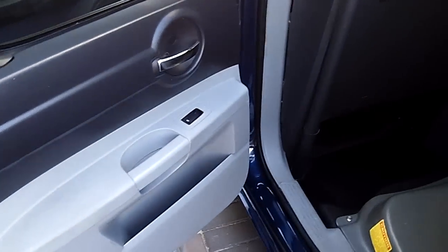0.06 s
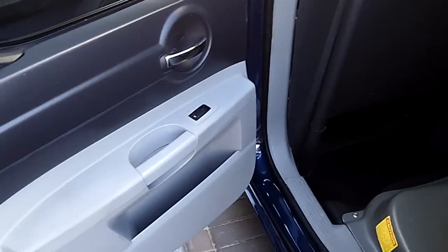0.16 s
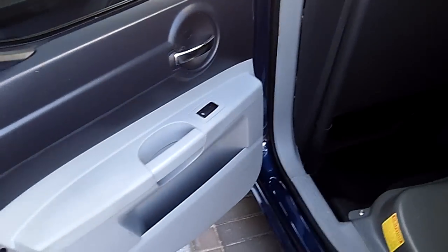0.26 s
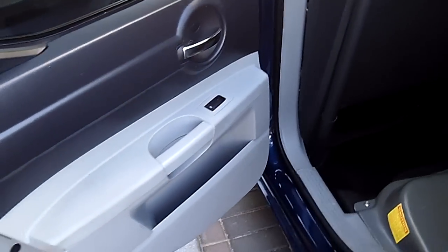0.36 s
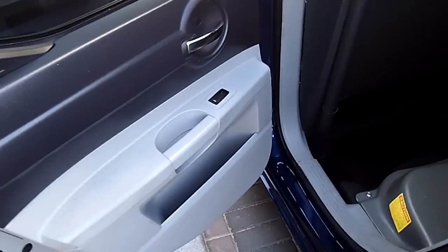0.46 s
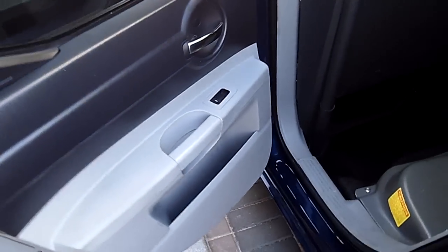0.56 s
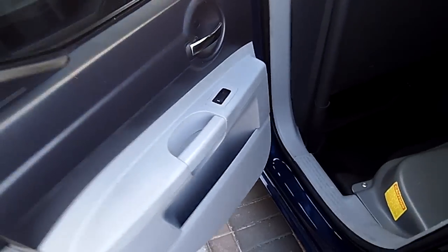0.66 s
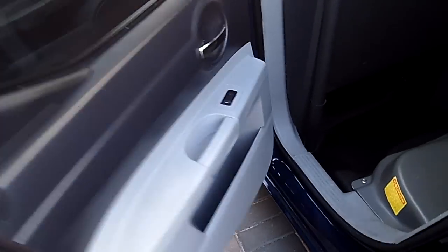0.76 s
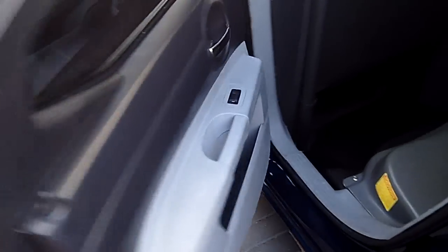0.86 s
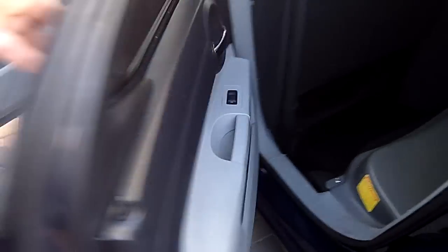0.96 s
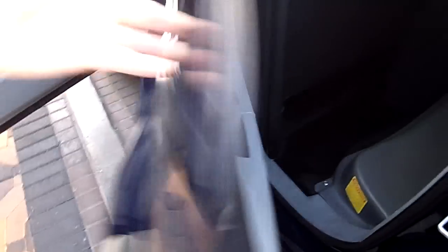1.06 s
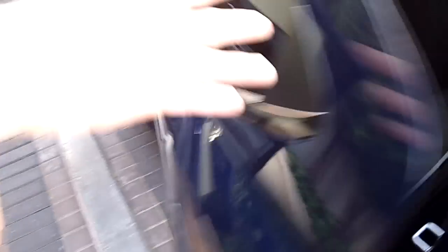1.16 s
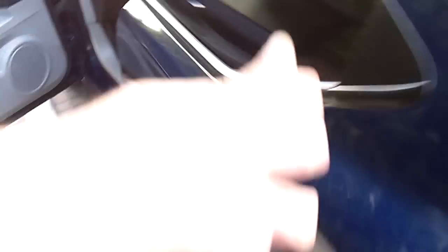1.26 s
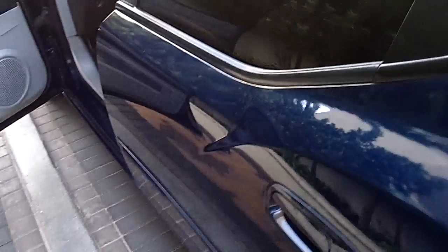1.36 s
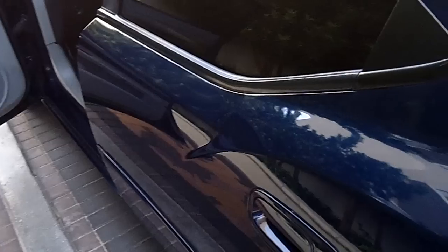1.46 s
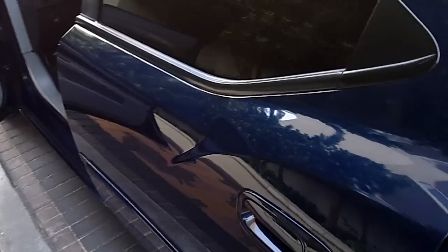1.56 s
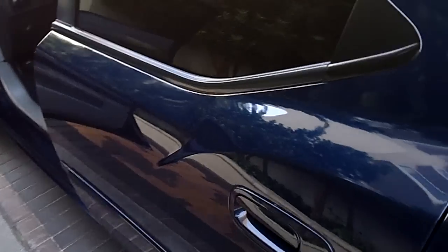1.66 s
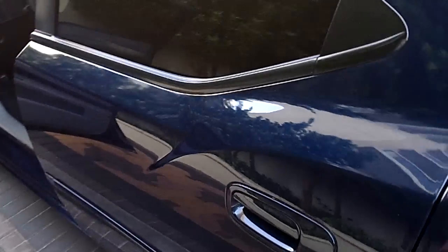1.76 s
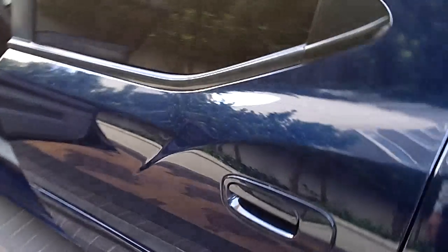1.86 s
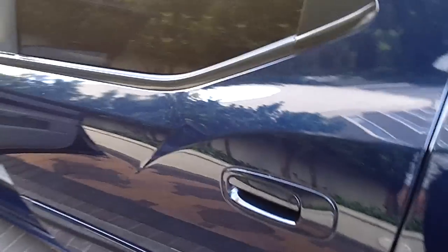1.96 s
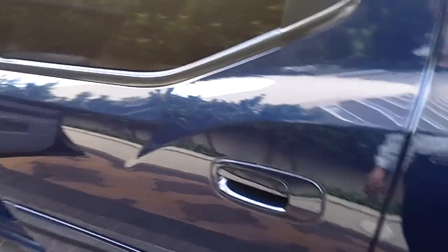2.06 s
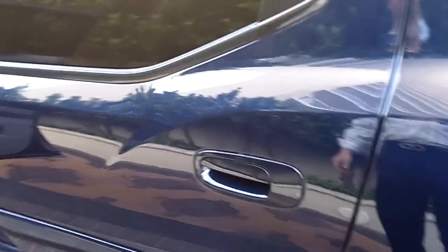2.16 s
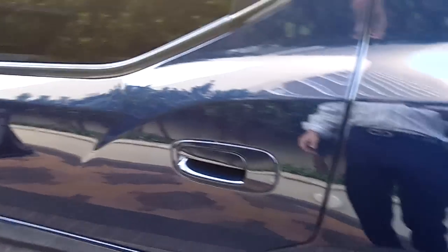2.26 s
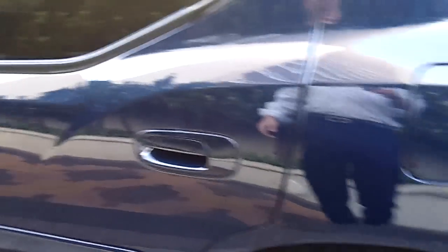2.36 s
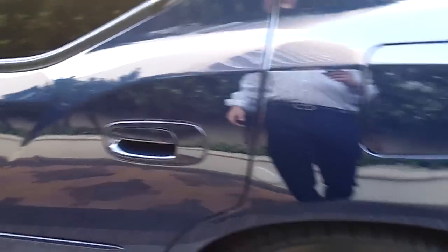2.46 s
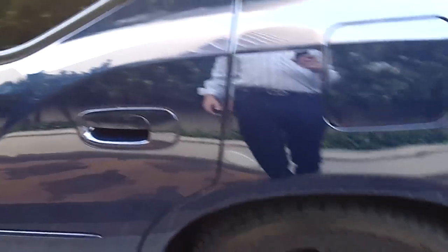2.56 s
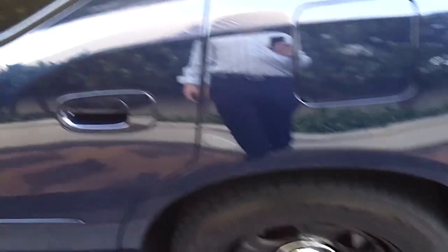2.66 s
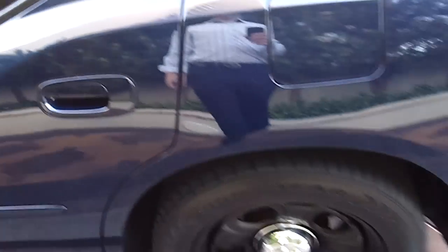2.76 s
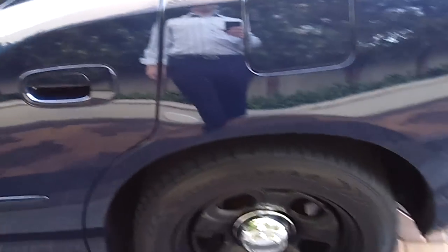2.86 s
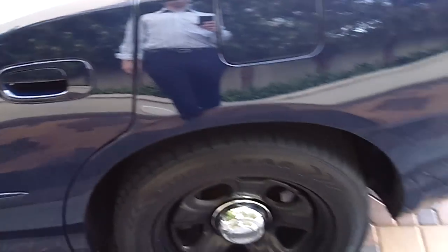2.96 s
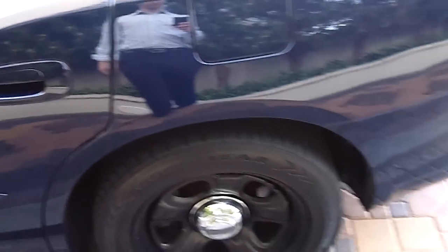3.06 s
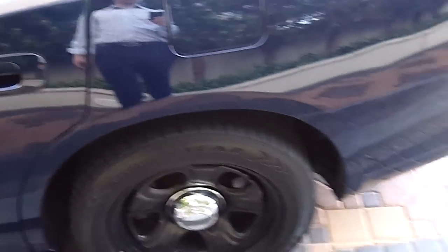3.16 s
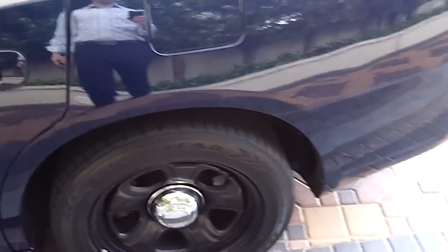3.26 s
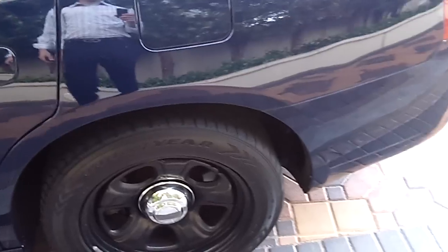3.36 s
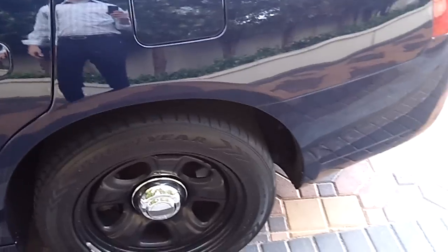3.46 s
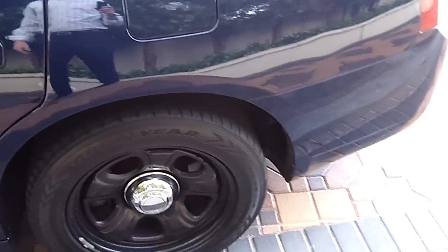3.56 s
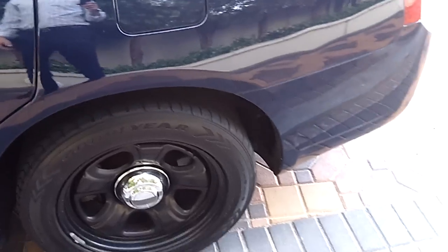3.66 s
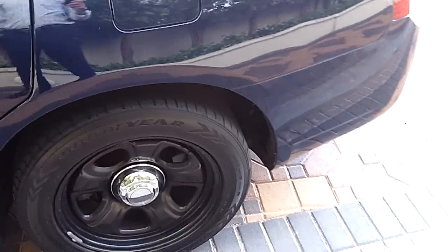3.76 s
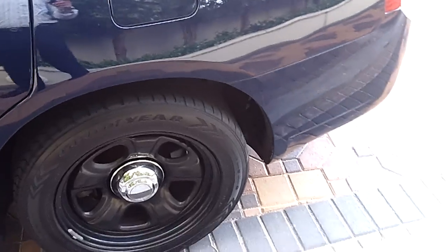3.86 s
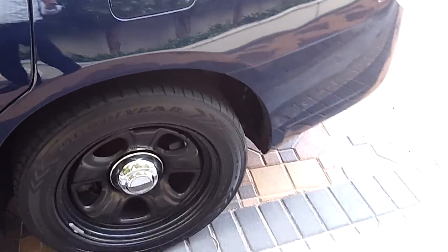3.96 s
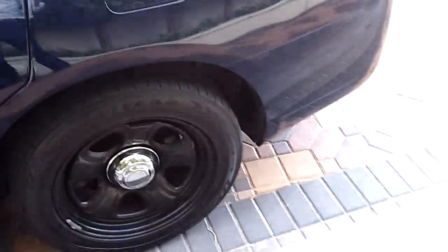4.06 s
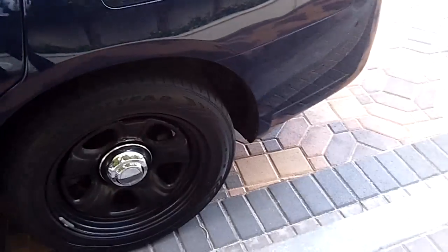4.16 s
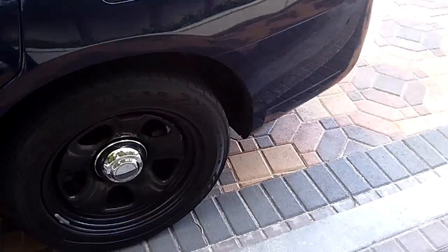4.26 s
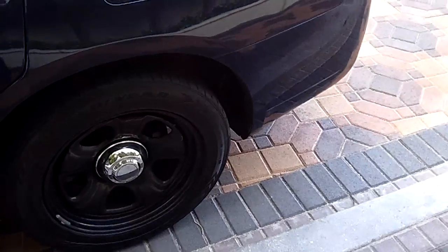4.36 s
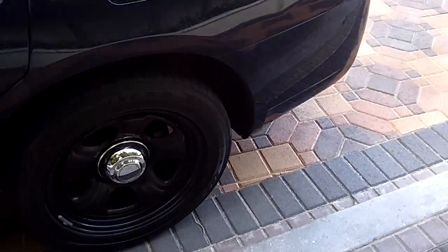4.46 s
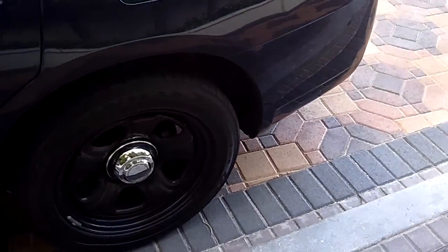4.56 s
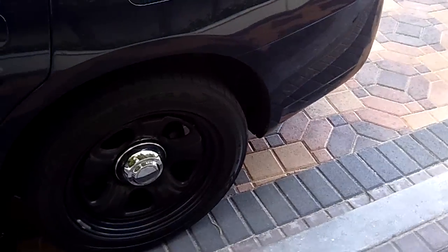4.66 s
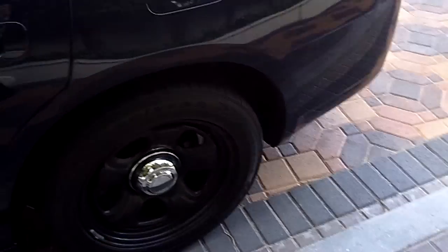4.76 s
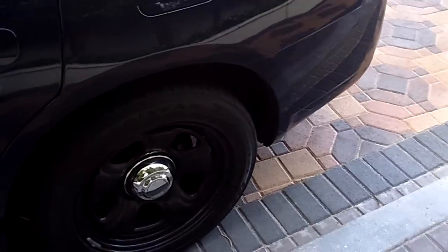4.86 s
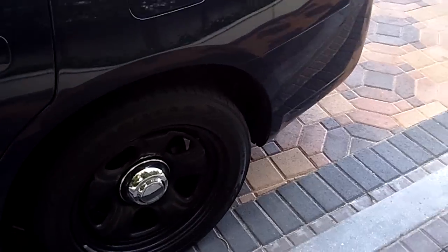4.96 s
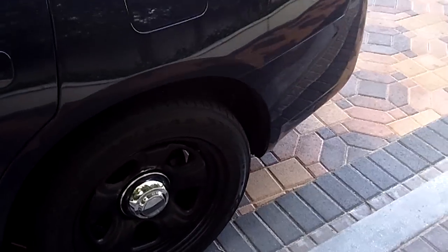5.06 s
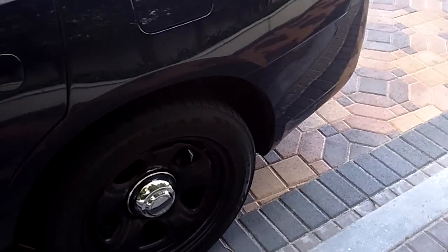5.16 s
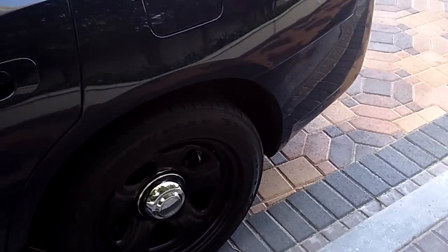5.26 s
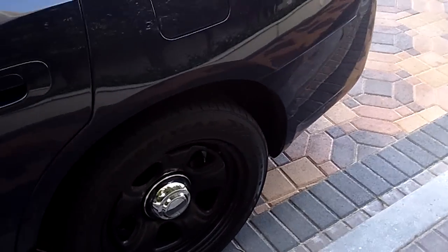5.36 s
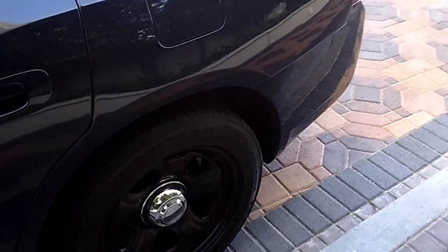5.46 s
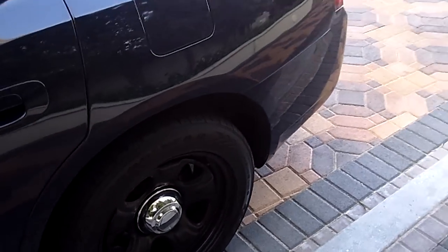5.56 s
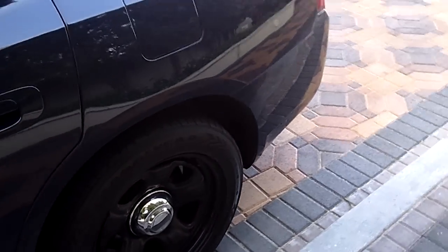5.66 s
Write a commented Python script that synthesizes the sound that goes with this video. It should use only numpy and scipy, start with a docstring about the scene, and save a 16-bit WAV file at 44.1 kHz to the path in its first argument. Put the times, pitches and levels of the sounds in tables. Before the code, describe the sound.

A steady engine idle with fan-like roar and faint unsteady machine tones fills a paved outdoor lot. Early on, a car door bangs shut very near the microphone, distorted and dry, with a brief rattling tail. Automatic gain pulls the hum down, then lets it creep up. Later come a barely audible peep and three small taps on the device's shell, the first much the strongest.

```python
"""In the open air over a paved lot, an engine idles as a harmonic series in noise, among faint machine whines.
At 1.5 s a car door slams: each contact excites damped modes and a noise crack, then the panels shudder.
The slam overloads the recorder, whose gain control ducks, holds and creeps back.
A faint falling chirp follows at 4.1 s; from 4.7 s three taps ring the camera's shell as damped modes."""
import sys
import numpy as np
from scipy import signal
from scipy.fft import rfft, irfft, next_fast_len
from scipy.io import wavfile
from scipy.ndimage import uniform_filter1d, map_coordinates

SR = 44100
rng = np.random.default_rng(int(sys.argv[2]) if len(sys.argv) > 2 else 0)


def bounce(signal):
    """Save signal as a 16-bit WAV file at the path given by the first command-line argument."""
    frames = np.transpose(np.atleast_2d(signal))
    limited = np.clip(frames, -1, 1)
    pcm = np.round(limited * 32767).astype(np.int16)
    wavfile.write(sys.argv[1], SR, pcm)


N = 251370

# door contacts, seal, latch, frame and rebounds: start_s, thud_db, crack_db, rise_s
DOOR_CONTACTS = [(1.487, -20, -39, 0.00084), (1.5333, 6, -8.5, 0.00027), (1.5368, -3.5, -9.5, 0.001),
                 (1.5418, -2, -19, 0.00083), (1.5441, 0, -11, 0.0014), (1.548, -1, -17, 0.00067),
                 (1.566, -7, -13, .0006), (1.576, -2, -24, 0.0018), (1.588, -19, -26, .001),
                 (1.611, -20, -35, .001), (1.622, -22, -34, .001), (1.659, -19, -36, 0.00081),
                 (1.666, -34, -38, .001)]
# damped modes of the door: pitch_hz, level_db, t60_s
DOOR_MODES = [(130, -35, 0.08), (188, -16.5, 0.071), (274.5, -17, 0.14), (350, -8.5, 0.058),
              (477, -11.5, 0.056), (592, -9, 0.039), (717, -6.5, 0.015), (803, -9.5, 0.028),
              (900, -6, 0.011), (1084, -28, 0.036), (1410, -28, .03), (1662, -24, 0.06),
              (1980, -19.5, 0.022), (2880, -21.5, .02), (3820, -32, .02), (5700, -41, 0.017)]
# outer skin, pushed as the seal squeezes: pitch_hz, level_db, t60_s
SKIN_MODES = [(663, 9.5, 0.049)]
# relative noise spectrum of the contact cracks: frequency_hz, density_db_per_hz
CRACK_SPECTRUM = [(300, -22), (1500, 3.5), (3000, -20), (6000, -14), (7700, -23), (10000, -20),
                  (16000, -31)]
# relative noise spectrum of the panels after the blow: frequency_hz, density_db_per_hz
SHUDDER_SPECTRUM = [(24, -34), (40, -4), (174, -14), (281, 3.5), (442, -16), (518, -9.5), (580, -14),
                    (1340, -13.5), (5220, -40), (9000, -59), (11700, -99), (19800, -120)]
# decay time of the panels: frequency_hz, t60_s
SHUDDER_DECAY = [(60, 1), (250, 0.21), (1000, 0.19), (4000, 0.14), (9000, 0.14)]
# taps on the camera's shell: start_s, click_db, rebound_db, thump_db, click_rise_s, direction (signed factor)
SHELL_TAPS = [(4.6724, 3.5, -2, -9, 0.0003, -1.07), (4.86198, -21, -8, -30, .00018, 1),
              (5.255, -45, -45, -27, .0004, -1)]
# bright modes of the shell: pitch_hz, level_db, t60_s
CLICK_MODES = [(1101, -11.5, 0.0059), (1495, -5.5, 0.0089), (1900, -8.5, 0.0062), (2270, -10, 0.0075),
               (3020, -0.5, 0.0034), (4300, -12, 0.006), (6240, -20, 0.0047), (8640, -16, 0.0021),
               (13100, -32, .003)]
# hollow modes of the shell: pitch_hz, level_db, t60_s
THUMP_MODES = [(238, 2, 0.015), (323, 6.5, 0.011), (457, 6, 0.013), (620, 1.5, 0.023), (1030, -2, 0.0093),
               (1500, 4, 0.009)]
# idling engine, its speed hunting up and down: time_s, firing_hz, first_order_db
ENGINE_IDLE = [(0.0, 42, -46), (0.3, 42.1, -43), (1.05, 40.35, -49.5), (1.4, 40.54, -47), (1.73, 41.0, -39),
               (1.98, 40.8, -38), (2.55, 42.7, -34), (3.0, 42.17, -35), (3.6, 40.5, -42),
               (4.25, 42.63, -37.5), (4.9, 42.63, -39), (5.45, 40.4, -44), (5.7, 41.6, -47)]
# levels of the two roar bands: time_s, low_roar_db, high_roar_db
ROAR_LEVELS = [(0.0, -34, -40), (1.5, -35, -41), (2.1, -36, -42), (2.7, -35, -40.5), (4.1, -37.5, -41),
               (4.5, -35, -38), (5.7, -35.5, -39)]
# relative spectrum of the low roar: frequency_hz, density_db_per_hz
LOW_ROAR_SPECTRUM = [(20, -12), (62, -6.5), (100, -6), (160, -5.5), (215, -2.5), (310, -5), (360, 1),
                     (420, -6), (460, -4), (530, -6.5), (597, -8), (670, -7.5), (741, -7.5), (870, -8.5),
                     (1100, -10.5), (1430, -14.5), (2420, -120)]
# relative spectrum of the high roar: frequency_hz, density_db_per_hz
HIGH_ROAR_SPECTRUM = [(410, -27), (800, -11), (1100, -7), (1400, -6), (1740, -3.5), (2100, -9), (2500, -13),
                      (2950, -12), (3500, -15.5), (3800, -20), (4450, -24), (4900, -23.5), (5300, -26.5),
                      (6400, -28), (7300, -35.5), (7700, -44.5), (9900, -53), (16700, -120)]
# machine whines: pitch_hz, faint_level_db, pitch_wander (scale, share of pitch), flicker_db (scale)
MACHINE_WHINES = [(239.4, -53, 0.0025, 2), (275.3, -52.5, 0.0014, 1.5), (884.4, -51.5, 0.00814, 4),
                  (1017, -65, .001, 3), (1057, -59, 0.00097, 4), (1188, -56, .001, 0),
                  (1310, -64, 0.00077, 1.5), (2836, -58.5, 0.00203, 1.5)]
# spells in which a whine stands out, one list for each whine: start_s, length_s, level_db
WHINE_SPELLS = [
    [(0.5, 1.07, -44.5), (1.75, 0.46, -44), (4.7, 1.1, -44)],
    [(-.1, 0.51, -45), (0.65, 2.07, -43.5), (3.2, 0.18, -46), (3.75, 0.89, -46), (5.0, 0.37, -45)],
    [(0.55, 0.41, -42.5), (1.28, .3, -38.5), (1.75, 1.82, -47), (3.8, 1.06, -46), (4.75, 0.53, -44.5),
     (5.6, 0.17, -43.5)],
    [(2.6, 1.2, -60), (4.3, 1.5, -52.5)],
    [(0.1, 2.3, -51.5), (2.3, 1.8, -55), (4.4, 1.44, -53)],
    [(-.1, 0.67, -53), (1.0, 0.56, -46), (2.95, 1.7, -50)],
    [(0.1, .8, -48.5), (0.9, .65, -44), (1.9, 1.1, -51), (3.45, 0.89, -49), (4.85, 0.54, -47)],
    [(4.7, 1.2, -56)],
]
# relative spectrum of the microphone hiss: frequency_hz, density_db_per_hz
HISS_SPECTRUM = [(4470, -33), (7600, -22.5), (7790, 3), (8380, 7.5), (10200, 4), (15000, 4.5), (15800, -1)]

SHUT_S = 1.55  # the second engine order steps in level here
SECOND_OPEN_DB, SECOND_SHUT_DB = -44.5, -39  # second order, door open and door shut
THIRD_DB, BOOM_HZ, BOOM_WIDTH_HZ = -43, 122, 7  # third order is loudest where it meets a boom near this pitch
SPELL_FADE_S = 0.047
CHIRP_S, CHIRP_LENGTH_S, CHIRP_DB, CHIRP_HZ, CHIRP_SAG_HZ = 4.088, .022, -66, 8480, 351
OVERLOAD_DB, REACTION_S, DUCK_S = 2.5, .0105, .008  # threshold, delay and smoothing of the gain control
TOP_HZ = 15830  # band limit


def amp(db):
    """Logarithmic level: decibels to a linear gain."""
    return 10 ** (np.asarray(db) / 20)


def unit(x):
    """Normalization: scaled to rms 1."""
    return x / np.sqrt(np.mean(x ** 2) + 1e-20)


def along(points, hz):
    """Logarithmic frequency scale: interpolates (frequency_hz, value) points."""
    f, v = np.transpose(points)
    return np.interp(np.log(hz + 1), np.log(f + 1), v)


def curves(rows):
    """Linear interpolation in time: one value per sample for each column after the time."""
    s, *cols = np.transpose(rows)
    return [np.interp(np.arange(N) / SR, s, c) for c in cols]


def wobble(rate):
    """Slow random modulation: a smooth curve through rate random knots a second."""
    knots = rng.standard_normal(int(N * rate / SR) + 4)
    return map_coordinates(knots, [np.arange(N) * rate / SR])


def filtered(x, response):
    """Linear filtering: the spectrum of x times a response of frequency."""
    m = next_fast_len(N + SR // 2)
    return irfft(rfft(x, m) * response(np.fft.rfftfreq(m, 1 / SR)), m)[..., :N]


def rush(spectrum, patchy_db):
    """Shaped noise of rms 1, its gain varying at random in patches of time and frequency."""
    z = signal.stft(rng.standard_normal(N), nperseg=512)[2]
    field = uniform_filter1d(rng.standard_normal(z.shape), 6, 0)
    field = uniform_filter1d(field, 14, 1)
    patchy = signal.istft(z * amp(patchy_db * unit(field)), nperseg=512)[1][:N]
    return unit(filtered(patchy, lambda hz: amp(along(spectrum, hz))))


def tone(hz):
    """Phase as the integral of frequency: a sine of rms 1 that follows a pitch curve."""
    return np.sqrt(2) * np.sin(2 * np.pi * np.cumsum(hz) / SR)


def ring(modes, attack, scatter_db):
    """Modal superposition: one blow excites damped modes with newly scattered strengths."""
    t = np.arange(SR // 4) / SR
    hz, db, t60 = np.transpose(modes)[:, :, None]
    db = db + scatter_db * rng.standard_normal(db.shape)
    partials = amp(db - 60 * t / t60) * np.sin(2 * np.pi * hz * t)
    return np.sum(partials, axis=0) * (1 - np.exp(-t / attack))


def add(track, s, sound):
    """Linear superposition: mixes a sound in at s seconds."""
    track[round(s * SR):][:len(sound)] += sound


def panel_shudder():
    """Frequency-dependent damping: panel noise swells, then decays with the treble dying first."""
    hz, t, z = signal.stft(rng.standard_normal(SR), SR, nperseg=256)
    decay_db = 60 * t / along(SHUDDER_DECAY, hz)[:, None]
    shape_db = along(SHUDDER_SPECTRUM, hz)[:, None] - decay_db
    shudder = signal.istft(z * amp(shape_db), SR, nperseg=256)[1][:SR]
    swell = 1 - np.exp(-np.arange(SR) / SR / 0.019)
    rattle = amp(2.6 * wobble(55.5)[:SR])  # loose trim makes the fade uneven
    return amp(-20.5) * unit(shudder * swell) * rattle


def door():
    """Impact excitation: the skin is pushed, contacts ring modes and crack, and the panels shudder."""
    out = np.zeros(N)
    add(out, 1.5282, -ring(SKIN_MODES, attack=.02, scatter_db=4))
    t = np.arange(SR // 50) / SR
    grit = rush(CRACK_SPECTRUM, patchy_db=-2.5)
    crack_rise = 1 - np.exp(-t / 0.00044)
    for s, thud_db, crack_db, rise in DOOR_CONTACTS:
        add(out, s, amp(thud_db) * ring(DOOR_MODES, attack=rise, scatter_db=1.5))
        crack_envelope = amp(crack_db - 60 * t / 0.0043) * crack_rise
        add(out, s, crack_envelope * grit[round(s * SR):][:len(t)])
    add(out, 1.534, panel_shudder())
    return out


def taps():
    """Impact on a shell: bright modes click, click again on a quick rebound, then hollow modes thump."""
    out = np.zeros(N)
    scatter_db = .8
    for s, click_db, rebound_db, thump_db, rise, direction in SHELL_TAPS:
        add(out, s, direction * amp(click_db) * ring(CLICK_MODES, rise, scatter_db))
        add(out, s + 0.00098, direction * amp(rebound_db) * ring(CLICK_MODES, rise, scatter_db))
        add(out, s + 0.00223, amp(thump_db) * ring(THUMP_MODES, 0.00066, scatter_db))
    return out


def engine():
    """Harmonic orders of the firing rate: exhaust hum over the roar of fan, belts and traffic."""
    hz, first_db = curves(ENGINE_IDLE)
    low_db, high_db = curves(ROAR_LEVELS)
    second_db = np.where(np.arange(N) < SHUT_S * SR, SECOND_OPEN_DB, SECOND_SHUT_DB)
    # resonance curve of the boom
    detuning = 2 * (3 * hz - BOOM_HZ) / BOOM_WIDTH_HZ
    third_db = THIRD_DB - 10 * np.log10(1 + detuning ** 2)

    hz = hz + 0.19 * wobble(6.02)
    hum = amp(first_db + .4 * wobble(8)) * tone(hz)
    hum += amp(second_db + 0.97 * wobble(2.4) + 0.52 * wobble(12)) * tone(2 * hz)
    hum += amp(third_db + 1.8 * wobble(14)) * tone(3 * hz)

    throb = amp(0.53 * tone(hz))  # the low roar swells once per firing
    low_noise = unit(throb * rush(LOW_ROAR_SPECTRUM, patchy_db=1.3))
    low = amp(low_db + .5 * wobble(7)) * low_noise
    high = amp(high_db + 0.12 * wobble(7)) * rush(HIGH_ROAR_SPECTRUM, patchy_db=1.1)
    return hum + low + high


def whines():
    """Frequency and amplitude modulation: unsteady faint tones, each fading up for spells."""
    t, out = np.arange(N) / SR, np.zeros(N)
    for (hz, faint_db, wander, flicker_db), spells in zip(MACHINE_WHINES, WHINE_SPELLS):
        level = amp(faint_db)
        for s, length, db in spells:
            inside_s = np.minimum(t - s, s + length - t)  # time to the nearer end of the spell
            fade = np.clip(inside_s / SPELL_FADE_S + .5, 0, 1)
            level = level + (amp(db) - amp(faint_db)) * fade
        flicker = unit(amp(1.1 * wobble(5.4) + flicker_db * wobble(14)))
        drift = wander * (.6 * wobble(5) + 0.81 * wobble(22))
        out += level * flicker * tone(hz * (1 + drift))
    return out


def chirp():
    """Frequency glide: a short falling peep under a half-sine envelope, perhaps a far bird."""
    u = np.clip((np.arange(N) / SR - CHIRP_S) / CHIRP_LENGTH_S, 0, 1)
    return amp(CHIRP_DB) * np.sin(np.pi * u) * tone(CHIRP_HZ - CHIRP_SAG_HZ * u ** 2)


def scene():
    """Superposition of all sources at the microphone."""
    return (door() + taps() + engine() + whines() + chirp())[None]


def gain_control(x, depth_db, hold_s, rise_db_per_s):
    """Delayed compression: an overload ducks the gain; after a hold it climbs at a steady rate in dB."""
    t = np.arange(N) / SR
    last_overload_s = np.maximum.accumulate(np.where(np.abs(x) > amp(OVERLOAD_DB), t, -N))
    since = t - last_overload_s
    db = np.clip(rise_db_per_s * (since - hold_s) - depth_db, -depth_db, 0)
    # average over past samples only, so the duck never leads its overload
    size = round(DUCK_S * SR)
    db = uniform_filter1d(db, size, origin=(size - 1) // 2, mode="nearest")
    return amp(np.interp(t - REACTION_S, t, db))


def record(dry):
    """Recording chain: microphone hiss, gain control, soft overload, bass cut, converter hiss, band limit."""
    x = dry[0] + amp(-68) * rush(HISS_SPECTRUM, patchy_db=2.0)
    x = x * gain_control(x, depth_db=21.5, hold_s=0.18, rise_db_per_s=8.5)
    x = x / (1 + np.abs(x / 0.73) ** 5) ** (1 / 5)  # saturates toward 0.73
    x = filtered(x, lambda hz: (1j * hz / (45 + 1j * hz)) ** 2)  # coupling capacitors thin the deep bass
    x = x + amp(-77.5) * rng.standard_normal(N)  # converter hiss
    return filtered(x, lambda hz: hz < TOP_HZ)[None]


dry = scene()
out = record(dry)
bounce(out)
```